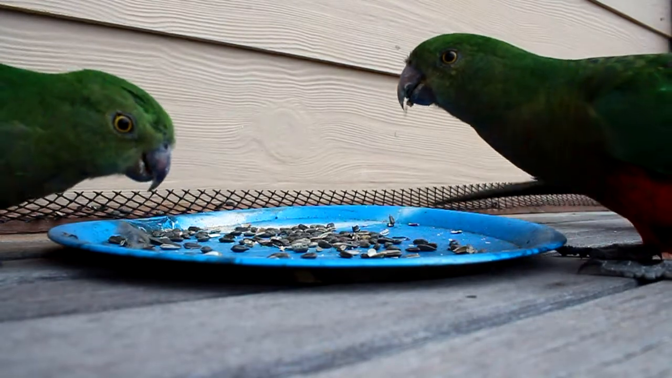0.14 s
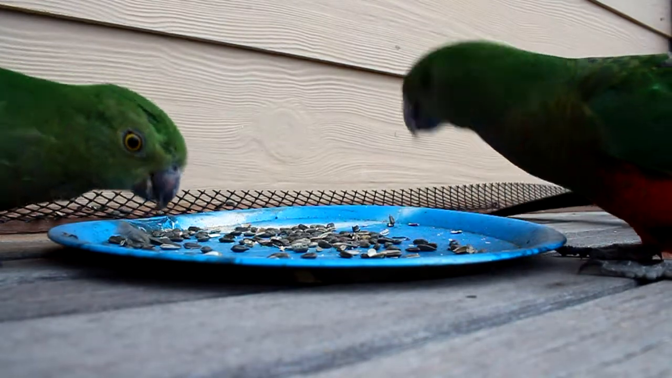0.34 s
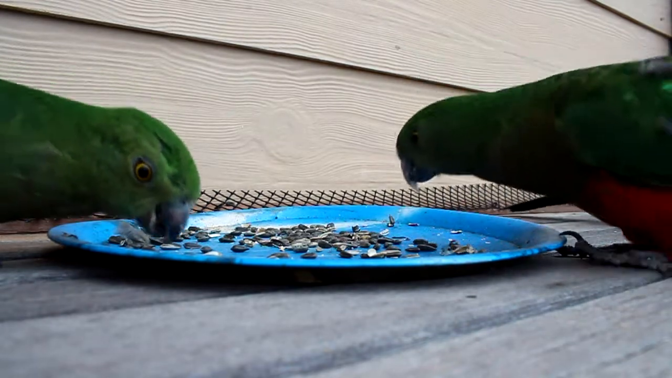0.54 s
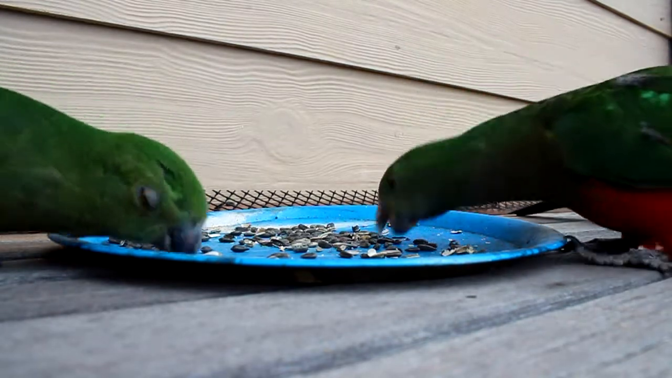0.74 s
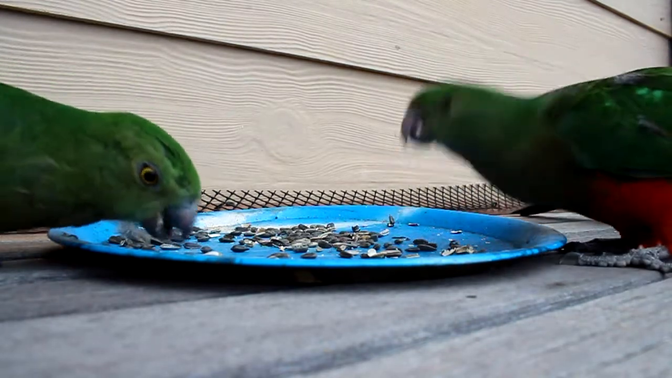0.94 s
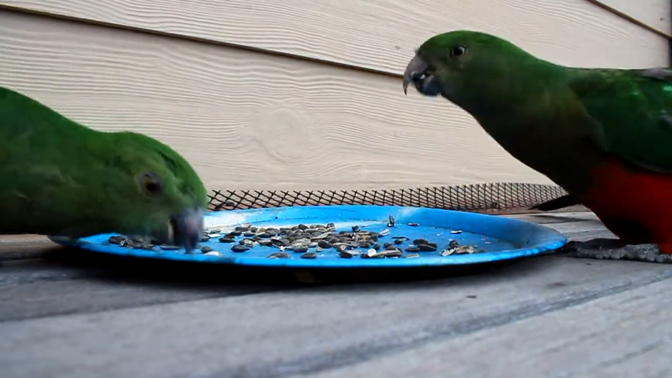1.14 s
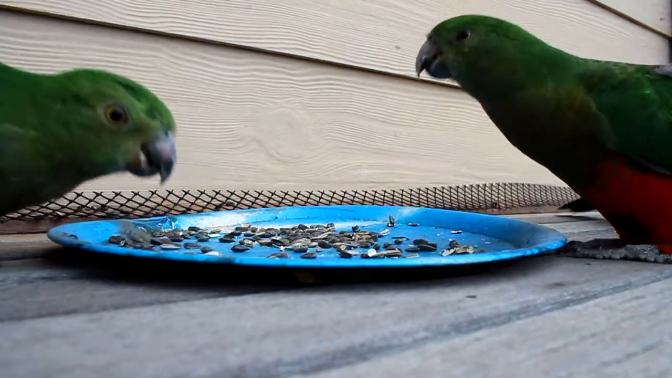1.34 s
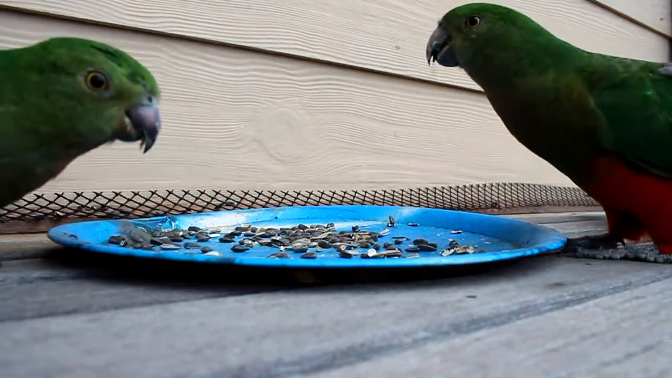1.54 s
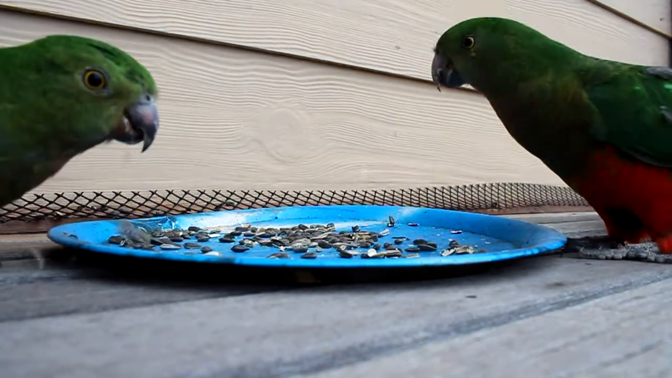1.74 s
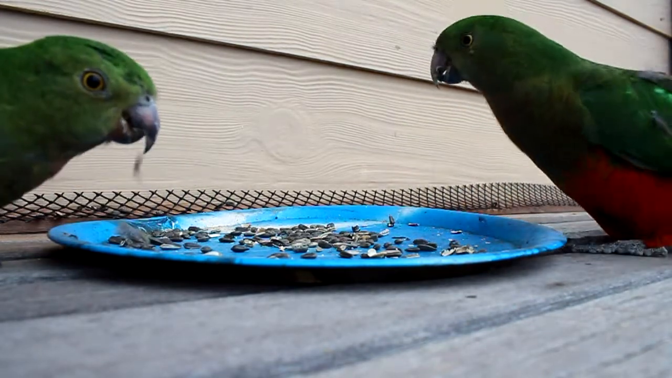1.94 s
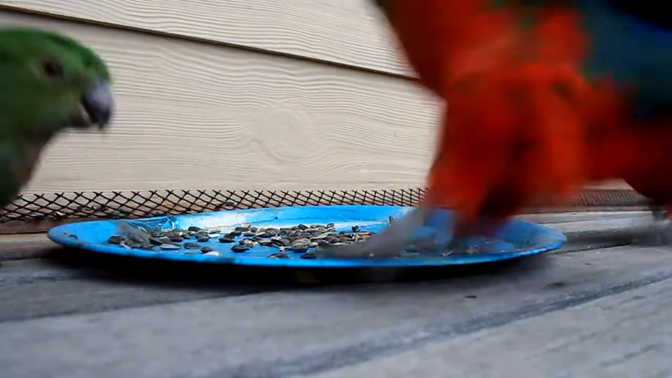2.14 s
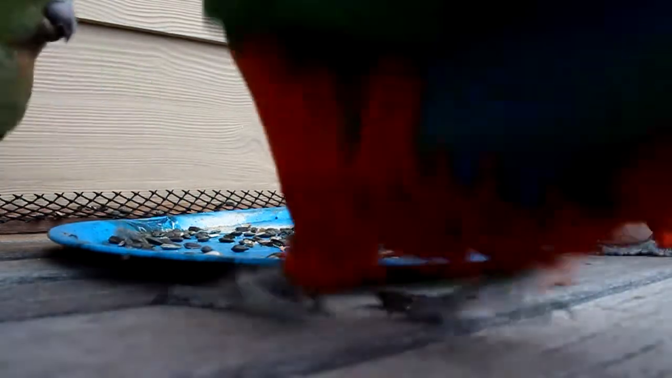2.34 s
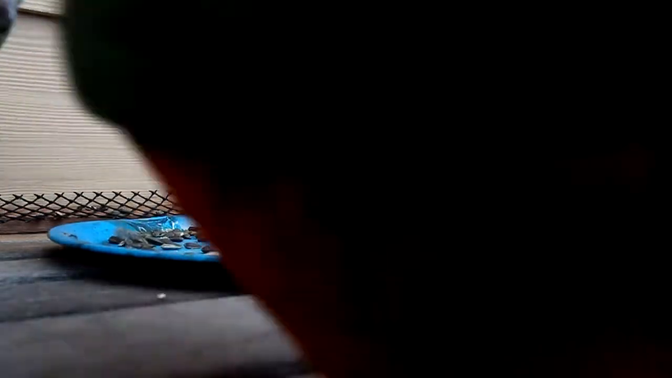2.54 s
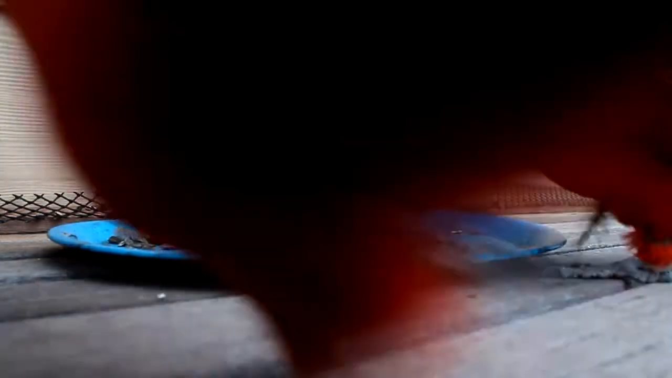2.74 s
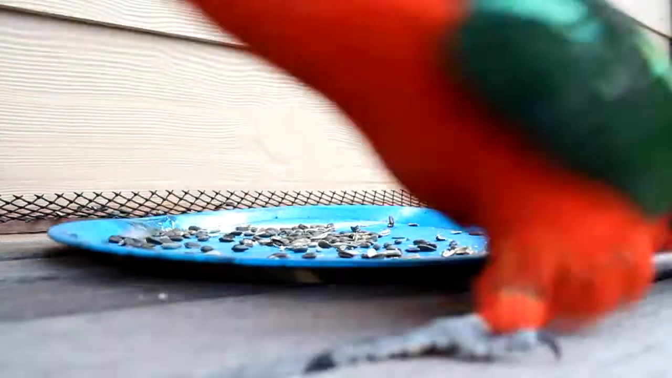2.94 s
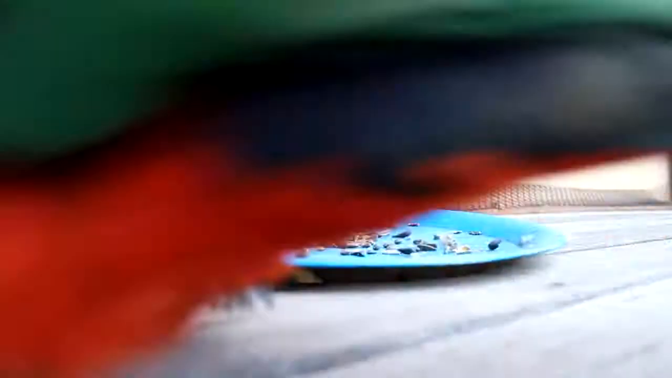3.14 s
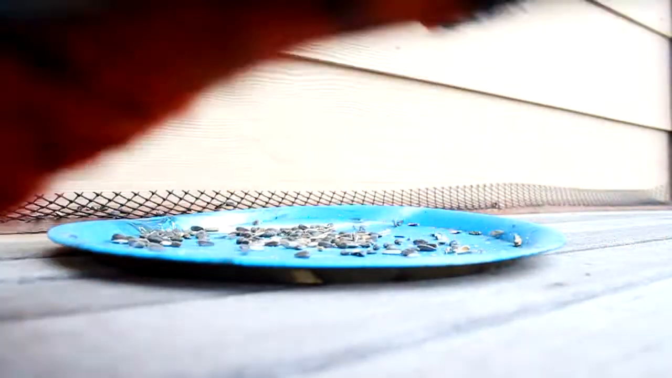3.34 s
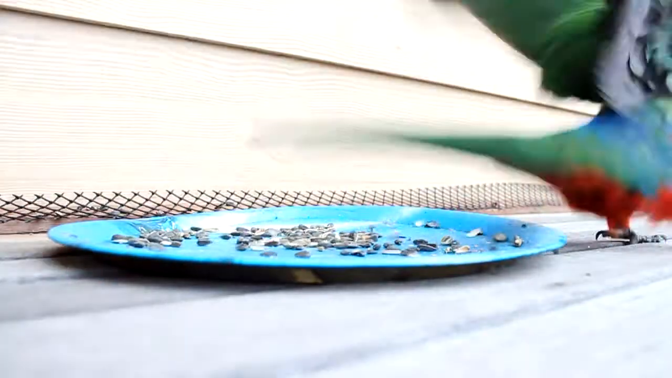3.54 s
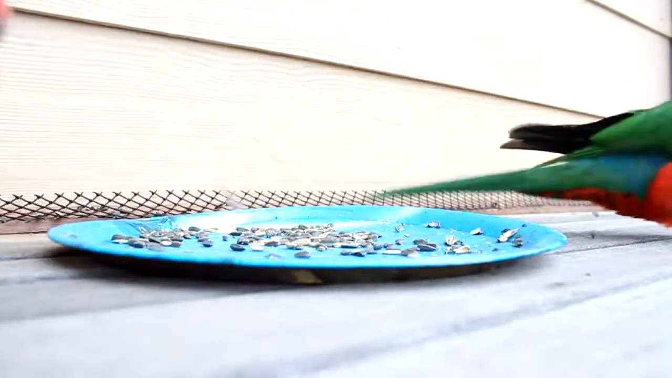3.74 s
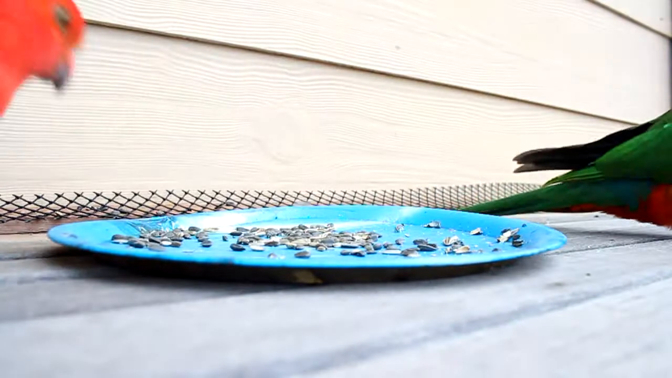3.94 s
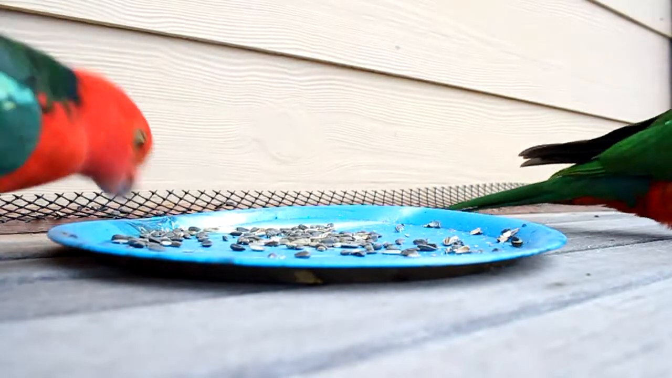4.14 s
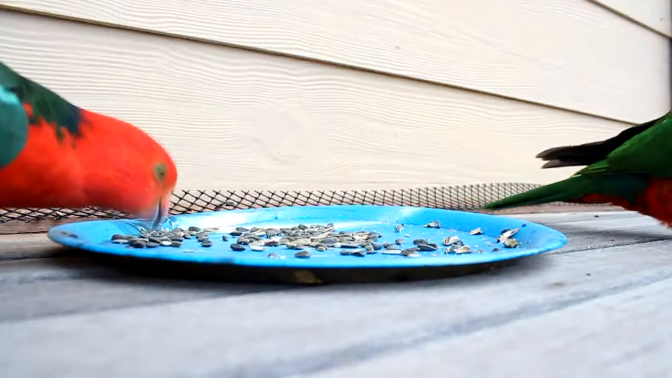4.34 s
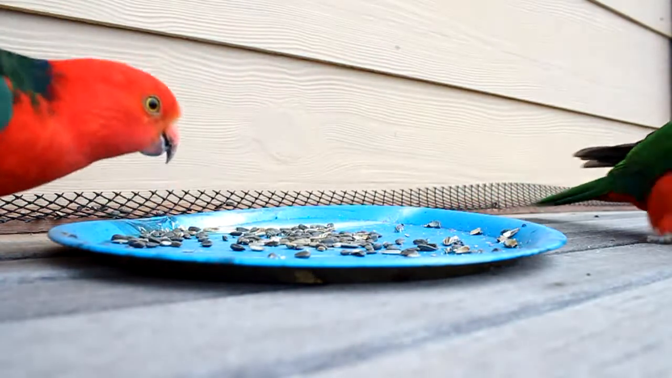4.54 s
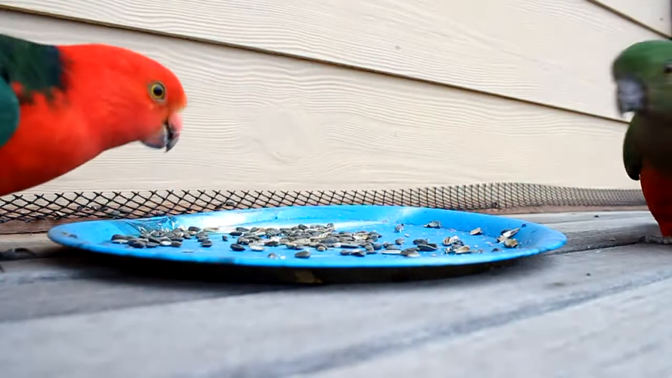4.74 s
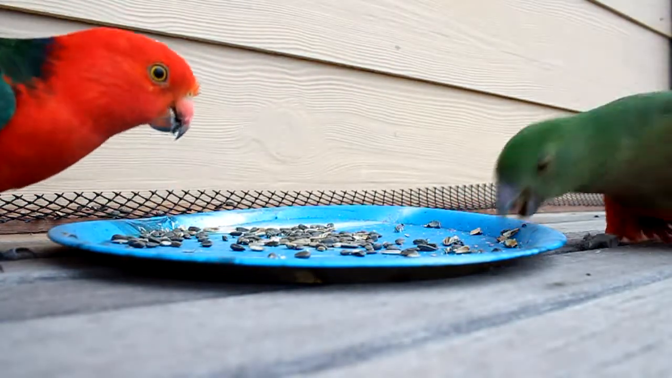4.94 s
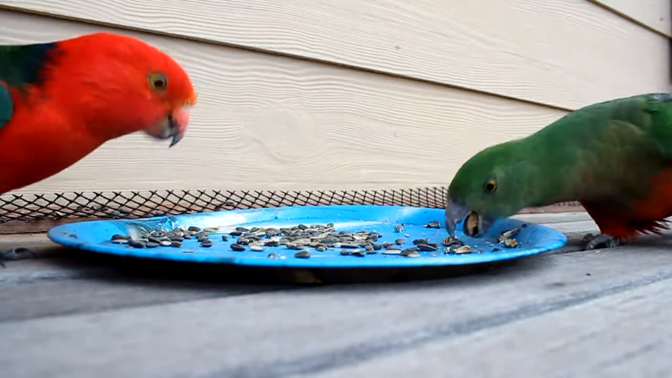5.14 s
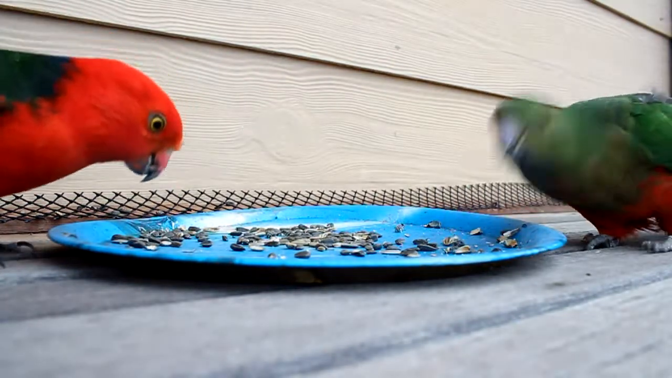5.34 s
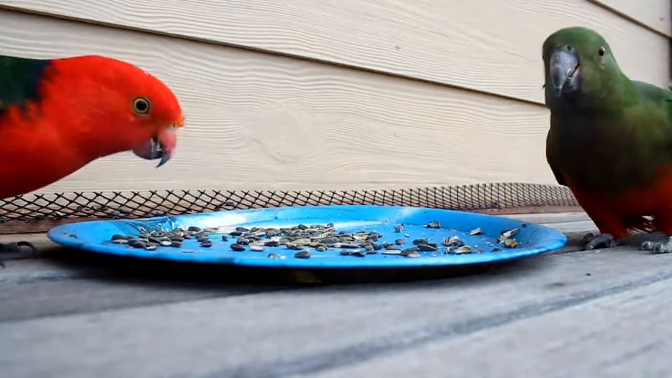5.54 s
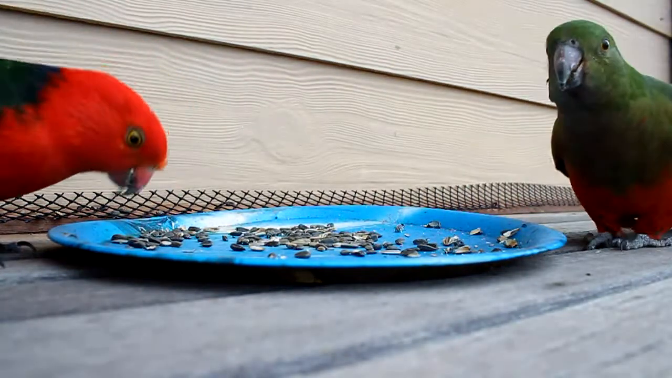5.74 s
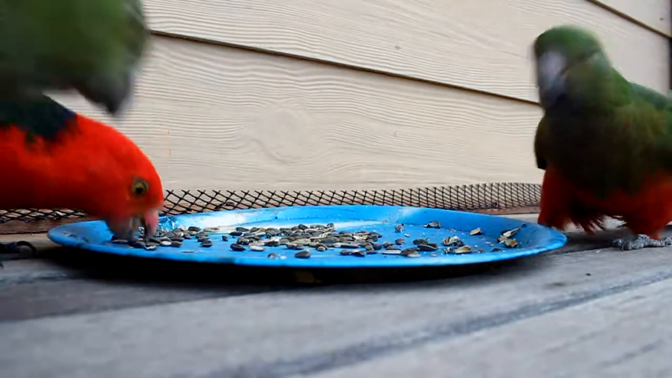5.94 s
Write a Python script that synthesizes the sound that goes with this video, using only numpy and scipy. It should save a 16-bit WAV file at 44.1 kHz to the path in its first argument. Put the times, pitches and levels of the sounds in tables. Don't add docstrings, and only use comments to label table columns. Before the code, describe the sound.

Close, dry seed cracking and beak pecks on a plate, interrupted midway by squawking and fluttering wings, then quieter feeding again.

```python
import sys
import numpy as np
from scipy import signal
from scipy.io import wavfile
from scipy.ndimage import uniform_filter1d

SR = 44100
rng = np.random.default_rng(int(sys.argv[2]) if len(sys.argv) > 2 else 0)


def invert_db(x):
    u = np.asarray(x, float) / 20
    return 10 ** u


def materialize(psi):
    bounded = np.clip(np.atleast_2d(psi).T, -1, 1)
    quanta = np.round(bounded * 32767).astype(np.int16)
    wavfile.write(sys.argv[1], SR, quanta)


N = 263277
HUSK_HZ = 7070


def rms_one(x):
    return x / np.sqrt(np.mean(x ** 2) + 1e-20)


def at_hz(points, hz):
    point_hz, point_db = np.transpose(points)
    return np.interp(np.log(hz), np.log(point_hz), point_db)


def drift(rate_hz, size):
    r = np.exp(-2 * np.pi * rate_hz / SR)
    return rms_one(signal.lfilter([1], [1, -2 * r, r * r], rng.standard_normal(size + 4000))[4000:])


def resonate(x, hz, width_hz):
    r = np.exp(-np.pi * width_hz / SR)
    zeros = np.array([1, 0, -1]) * (1 - r * r) / 2
    return signal.lfilter(zeros, [1, -2 * r * np.cos(2 * np.pi * hz / SR), r * r], x)


def swell(s, db, half_s):
    return invert_db(db - 16.5 * np.abs(np.arange(N) / SR - s) / half_s)


def add(out, s, piece, peak_db):
    i = round(s * SR)
    piece = piece[:N - i]
    out[i:i + len(piece)] += invert_db(peak_db) * piece / np.max(np.abs(piece))


def grains(per_s, spread_db):
    sizes = invert_db(spread_db * np.minimum(rng.exponential(1, (2, N)), 4))
    hits = rng.random((2, N)) < per_s / SR
    return rng.standard_normal((2, N)) * (0.15 + sizes * hits)


def banded(source, spectrum, patchy_db):
    out, edges = 0, 24 * 2 ** np.arange(0, 10, .5)
    for k, (low, high) in enumerate(zip(edges, edges[1:])):
        bandpass = signal.butter(2, [low, high], "band", fs=SR, output="sos")
        band = signal.sosfilt(bandpass, source[k % 2])
        flicker_db = patchy_db * np.minimum(drift(29.0, N), 1.4)
        out = out + invert_db(at_hz(spectrum, np.sqrt(low * high)) + flicker_db) * band
    return rms_one(out)


def contacts(table, sharpness, broad_db, low_hz, ring_db):
    out, t = np.zeros(N), np.arange(6000) / SR
    highpass = signal.butter(2, low_hz, "high", fs=SR, output="sos")
    for (s, peak_db, hz, t60), noise in zip(table, rng.standard_normal((len(table), 2, len(t)))):
        dying = invert_db(-60 * t / np.clip(t60, .004, .4))
        burst = noise[0] * invert_db(18 * uniform_filter1d(noise[1], size=40)) * dying
        note_gain = invert_db(ring_db) * np.clip(.15 / t60, .5, 3) * (hz < 1100)
        note = note_gain * np.sin(2 * np.pi * hz * t) * (1 - np.exp(-t / .004)) * dying
        coloured = resonate(burst, hz, hz / sharpness)
        broad = invert_db(broad_db) * signal.sosfilt(highpass, burst)
        add(out, s, coloured + broad + note, peak_db)
    return out


def knocks_of_beaks_and_claws():
    # (time [s], peak [dB], pitch [Hz])
    claws = [(0, -27.5, 1260), (0.104, -27.5, 1440), (.237, -31.5, 1950), (.297, -37, 1570),
             (0.456, -33, 1750), (.6, -31, 1640), (0.721, -22, 1650), (1.427, -28, 1190),
             (1.812, -35, 1900), (2.111, -41, 1290), (2.5, -24, 1260), (3.684, -30, 1420),
             (3.86, -29, 1420), (4.117, -29, 1450), (4.399, -31, 1120), (4.524, -31, 1120),
             (4.589, -30.5, 1420), (5.937, -40.5, 1530)]
    # (time [s], peak [dB], pitch [Hz], t60 [s])
    pecks = [(.055, -36, 860, 0.061), (.108, -48.5, 500, 0.14), (.165, -49, 507, 0.25),
             (.36, -43, 265, 0.53), (.553, -37, 812, 0.26), (.703, -38.5, 810, 0.024),
             (.824, -28.5, 789, 0.23), (.902, -38, 800, 0.23), (1.095, -27.5, 813.5, 0.19),
             (1.17, -38.5, 918, 0.16), (1.94, -37, 905, 0.16), (2.212, -24, 866, 0.31),
             (2.391, -22.5, 842, 0.27), (2.404, -19, 1170, 0.12), (2.418, -27, 845, 0.32),
             (2.559, -31.5, 910, 0.22), (2.645, -19, 905, 0.033), (2.66, -32.5, 917, 0.21),
             (3.722, -33, 853, 0.056), (3.634, -39, 799, 0.52), (3.896, -33, 980, 0.096),
             (4.013, -43, 1060, 0.084), (4.159, -35, 943, 0.19), (4.326, -32, 715.5, 0.19),
             (4.36, -25, 1060, 0.097), (4.708, -30, 822, 0.073), (4.822, -36, 894, 0.023),
             (5.282, -33.5, 820, 0.007), (5.389, -29, 825, 0.094), (5.584, -38, 860, 0.042),
             (5.704, -36, 886, 0.17), (5.819, -32, 852, 0.053)]
    claw_t60_s = 0.084
    blows = pecks + [(*row, claw_t60_s) for row in claws]
    return contacts(blows, sharpness=3.2, broad_db=-51.5, low_hz=500, ring_db=-15.5)


def plate(blows):
    # (pitch [Hz], level [dB], t60 [s])
    modes = [
        (512.6, 3.5, 0.074),
        (800, 0.5, 0.24),
        (873, -1, 0.41),
        (1060, -41, 0.53),
        (1420, -5.5, 0.033),
        (1970, -5.5, 0.0074),
    ]
    return sum(invert_db(db) * resonate(blows, hz, np.log(1000) / np.pi / t60) for hz, db, t60 in modes)


def stirring():
    # (time [s], level [dB])
    stir = [(0, -51.5), (.65, -56), (.9, -66), (1.3, -52), (1.852, -61.5), (2.08, -49.5), (2.18, -52.5),
            (2.4, -44.5), (2.621, -61.5), (2.93, -31.5), (3.03, -80), (3.5, -57), (4.27, -56.5), (4.8, -60),
            (4.928, -45.5), (5.05, -59), (5.47, -52), (5.7, -56.5)]
    stir_db = np.interp(np.arange(N) / SR, *np.transpose(stir))
    return stir_db, invert_db(2.0 * drift(18, N))


def feather_rustle(stir_db, jerks):
    # (frequency [Hz], density [dB per Hz])
    rustle_spectrum = [(1180, -70), (2000, 8), (3250, -4.5), (3510, -1.5), (13600, -9), (15800, -2)]
    # (time [s], level [dB], half length [s])
    flurries = [
        (2.69, -40.5, 0.072),
        (2.95, -31, 0.071),
        (2.85, -43.5, 0.069),
        (2.975, -34, .03),
        (3.52, -50.5, 0.64),
    ]
    level = invert_db(-58.5 + .65 * (stir_db + 52.5)) + sum(swell(*row) for row in flurries)
    return level * jerks * banded(grains(900, spread_db=1.2), rustle_spectrum, patchy_db=3.0)


def body_shuffle(stir_db, jerks):
    # (frequency [Hz], density [dB per Hz])
    shuffle_spectrum = [(120, -26), (200, -14.5), (736, -15), (804, 10), (983, -19.5), (1250, -12),
                        (4000, -27), (5200, -24), (8800, -120)]
    return invert_db(stir_db - 2) * jerks * banded(grains(600, spread_db=3.0), shuffle_spectrum, patchy_db=1.5)


def background_hiss():
    # (frequency [Hz], density [dB per Hz])
    hiss_spectrum = [(15, -36), (25, 17), (59, -17), (513, 17.5), (587, 8.5), (881, 11), (4450, -3.5),
                     (7420, 3.5), (15800, -39)]
    return invert_db(-60 - 4) * banded(rng.standard_normal((2, N)), hiss_spectrum, patchy_db=1.5)


def stirred_air():
    # (time [s], level [dB], half length [s], middle of the rumble [Hz])
    wafts = [(0.454, -47.5, 0.11, 252), (.48, -52, 0.065, 60.6), (0.88, -48.5, 0.23, 288),
             (0.954, -54.5, 0.054, 70.6), (1.974, -56, 0.029, 252), (2.364, -50.5, 0.19, 230),
             (2.666, -49.5, 0.31, 254), (2.872, -48, 0.066, 37.4), (4.936, -50.5, 0.13, 40.3),
             (3.026, -23, 0.043, 220), (3.072, -32, 0.053, 245), (3.185, -28, 0.039, 237),
             (3.15, -44, 0.16, 30), (3.614, -46, 0.15, 29.6), (3.536, -43.5, 0.17, 171.5),
             (3.651, -32.5, 0.011, 155), (3.775, -33.5, 0.061, 139), (4.106, -57.5, 0.088, 79.4),
             (4.403, -55, 0.34, 320), (4.955, -47, 0.14, 204), (5.466, -50, 0.13, 215)]
    still_air = (0, -70.5, 1e3, 117)
    out = np.zeros(N)
    air = rng.standard_normal(N) * invert_db(3.0 * drift(40, N))
    for s, db, half_s, hz in wafts + [still_air]:
        bandpass = signal.butter(2, [hz / 1.96, hz * 2.45], "band", fs=SR, output="sos")
        out += swell(s, db, half_s) * rms_one(signal.sosfilt(bandpass, air))
    return out


def all_cracks():
    # (time [s], peak [dB])
    husks = [(.0421, -8), (.058, -23), (.1536, -25), (.1978, -20), (.2144, -8.5), (1.2773, -33),
             (1.467, -19.5), (1.5827, -18), (1.6413, -28), (1.6562, -17.5), (1.8101, -8), (1.8283, -19.5),
             (1.8844, -23.5), (2.0582, -27), (3.6349, -30), (3.799, -23), (3.8954, -24), (4.3986, -30.5),
             (4.6534, -21), (4.689, -19), (4.7053, -24), (5.0118, -22), (5.3287, -29), (5.475, -25.5),
             (5.5375, -10), (5.568, -18), (5.6779, -27.5), (5.7645, -23.5), (5.789, -21)]
    # (time [s], peak [dB])
    shells = [(.0283, -20), (.344, -33), (.4559, -29), (.9763, -30.5), (1.0057, -40), (1.0465, -32),
              (1.4142, -4), (1.4244, -8), (1.6357, -31), (1.6434, -18), (1.6839, -21), (2.1163, -1.5),
              (2.2024, -26), (2.512, -24), (2.9983, 3), (3.482, -17), (5.0554, -16.5), (5.5738, -18.5)]
    # (time [s], peak [dB])
    splinters = [(.1406, -23), (.2303, -29), (1.4118, -0.5), (1.5384, -18.5), (1.5548, -8), (1.752, -25.5),
                 (1.7858, -8.5), (2.0184, -19), (2.0256, -14), (2.0286, -32), (3.6536, -19.5),
                 (4.2857, -27), (4.8057, -54), (4.8154, -21), (4.824, -21), (4.9632, -5.5), (4.9705, -23),
                 (4.9767, -16), (5.605, -14)]
    # (time [s],
    # peak [dB], pitch [Hz])
    pitched_snaps = [(0.218, -16, 5830), (0.578, -20.5, 4000), (.602, -21, 5070), (0.7213, -14, 4400),
                     (1.1722, -20.5, 2960), (1.4301, -10.5, 2700), (2.5, -23.5, 2770), (2.647, -20, 6100),
                     (2.654, -32, 2530), (2.9938, 4, 3000), (3.0044, -19, 3400), (3.7086, -25, 3030),
                     (4.365, -20, 2700), (4.484, -32.5, 3200), (4.9144, -23.5, 5600), (5.3897, -23.5, 5200),
                     (5.7049, -21, 2850), (5.9366, -18, 5300), (4.6898, -14.5, 2320), (5.0572, -19, 1600),
                     (2.3915, -16, 2420), (2.408, -16, 2000), (2.413, -20, 1510), (3.482, -21, 2600),
                     (4.0143, -25, 2970), (3.038, -38, 2600)]
    # (time [s], peak [dB])
    crumbs = [(0.868, -23.5), (0.939, -35), (1.3299, -28.5), (4.6495, -34), (1.444, -20), (1.4514, -22),
              (1.4574, -22), (1.5184, -40), (1.568, -32), (1.6076, -36), (1.677, -31), (1.7644, -44),
              (1.796, -15.5), (4.671, -39), (4.7945, -44), (4.8186, -31), (4.9327, -41), (4.9441, -50),
              (5.022, -35), (5.552, -29), (5.5982, -33), (5.618, -49), (2.3133, -26), (2.429, -25),
              (2.445, -35), (2.5427, -29.5), (2.765, -29), (2.9691, -34), (3.941, -35), (3.969, -38),
              (4.065, -30), (4.274, -42)]
    kinds = ((husks, HUSK_HZ), (shells, 9800), (splinters, 17700))
    snaps = [(*row, hz) for rows, hz in kinds for row in rows]
    return snaps + pitched_snaps + [(*row, 10500) for row in crumbs]


def cracks():
    out, t = np.zeros(N), np.arange(2000) / SR
    highpass = signal.butter(2, 900, "high", fs=SR, output="sos")
    snaps = all_cracks()
    for (s, peak_db, hz), noise in zip(snaps, rng.standard_normal((len(snaps), len(t)))):
        click = np.sign(noise[0]) * (t == 0)
        lumps_db = 30 * uniform_filter1d(noise[::-1], size=30)
        crumbling = invert_db(-28 + 4 * noise[1] - 60 * t / .022 + lumps_db)
        burst = click + noise * (.35 * np.exp(-t / .0002) + crumbling)
        hz = min(hz * np.exp(.07 * noise[2]), .42 * SR)
        grinding = noise[::-1] * invert_db(-19 - 60 * t / 0.074 + 40 * uniform_filter1d(noise, size=60))
        grind = min(hz / HUSK_HZ, 1) ** 2 * resonate(grinding, HUSK_HZ, 1600)
        hollow = 4.1 * resonate(burst, hz, hz / 3.8)
        broad = invert_db(-4.5 - 0.28 * np.log2(hz / 7000)) * signal.sosfilt(highpass, burst)
        sparkle = 1.56 * resonate(burst, 14600, 2900)
        thud = invert_db(6.5 - 1.5 * np.log2(hz / 5000)) * resonate(burst, 1690, 1320)
        add(out, s, grind + hollow + broad + sparkle + thud, peak_db)
    return out + invert_db(-2.0) * resonate(out, 7200, 760)


def near_echoes(snaps):
    # (delay [s], level [dB])
    reflections = [
        (.0017, -17),
        (.0046, -17.5),
    ]
    return sum(invert_db(db) * np.pad(snaps, (round(late * SR), 0))[:N] for late, db in reflections)


def seed_rattles():
    # (time [s], peak [dB], brightest [Hz], t60 [s])
    scatters = [(0.0403, -11, 8800, 0.077), (0.1493, -24, 7260, 0.074), (0.2115, -20.5, 6140, 0.057),
                (0.3423, -19.5, 6300, 0.038), (0.4558, -39, 4130, 0.23), (0.5784, -19, 10500, 0.084),
                (0.7208, -13.5, 4000, 0.13), (0.8295, -22, 3670, 0.31), (1.0972, -27.5, 2840, 0.11),
                (1.928, -26, 8800, 0.12), (2.0572, -29, 6070, 0.46), (2.1161, 5, 10500, 0.08),
                (2.2036, -10, 9800, 0.15), (2.3495, -18, 3700, 0.47), (2.4982, -43, 3020, 0.06),
                (2.646, -15, 5000, 0.024), (2.997, 2, 4100, 0.052), (3.4819, -31.5, 7360, 0.46),
                (3.7978, -50, 7900, 0.091), (4.0146, -32, 3230, 0.44), (4.117, -26, 3440, 0.074),
                (5.9356, -14, 5900, 0.085)]
    # (pitch [Hz], level [dB])
    rim = [(1450, 14), (2240, 4), (3103, 4.5), (5500, 1.5), (6700, -15), (4000, -5), (6040, 4),
           (10500, -13), (11170, 4), (4400, -1.5)]
    rattles = contacts(scatters, sharpness=1.3, broad_db=-13, low_hz=1300, ring_db=-60)
    return rattles + sum(invert_db(db + 3.5) * resonate(rattles, hz, 25 + hz / 200) for hz, db in rim)


def scuffs_and_slaps():
    # (time [s], peak [dB], brightest [Hz], t60 [s])
    scuffs = [(.104, -55, 4000, 0.052), (.23, -27, 5500, 0.045), (.297, -59, 3500, 0.082),
              (.355, -32.5, 4150, 0.033), (.3974, -51, 2300, .03), (.4134, -42, 2500, .05),
              (.468, -40, 4200, 0.13), (.555, -34.5, 3000, 0.034), (.669, -42, 4400, .06),
              (.698, -38.5, 2480, 0.048), (.781, -42, 7000, 0.023), (.79, -44, 3000, 0.044),
              (.824, -36, 4500, .2), (.965, -39.5, 1680, 0.049), (1.0325, -40, 6000, 0.02),
              (1.13, -38, 1500, .04), (1.155, -55, 7000, 0.018), (1.206, -38, 1650, 0.072),
              (1.251, -37.5, 2350, 0.037), (1.281, -39, 5430, .02), (1.296, -56, 2980, 0.045),
              (1.344, -41, 8000, .03), (1.365, -34, 2430, 0.023), (2.237, -19.5, 4950, 0.066),
              (2.268, -27.5, 4000, 0.056), (2.289, -43, 9550, 0.016), (2.364, -44, 3200, 0.031),
              (2.391, -44, 5000, 0.14), (2.405, -28, 3180, 0.12), (2.436, -33, 1990, .06),
              (2.5625, -32, 4319, 0.088), (2.679, -29, 8000, .1), (2.729, -47, 6950, 0.024),
              (2.876, -24, 4550, 0.065), (2.94, -19, 5000, 0.05),
              (3.941, -51, 1600, 0.057), (4.107, -34, 2980, 0.12), (4.184, -38, 1690, 0.085),
                   (4.223, -40.5, 1900, 0.042), (4.331, -32.5, 1720, 0.096), (4.45, -61, 1700, 0.031),
                   (4.473, -59, 1700, .03), (4.5032, -36, 3670, 0.11), (4.781, -40, 1710, 0.079),
                   (4.868, -69, 1950, .05), (5.171, -37.5, 2470, 0.052), (5.254, -42, 2700, 0.03),
                   (5.505, -36, 2600, 0.036), (5.819, -38, 1900, 0.067), (5.915, -38.5, 6800, 0.086),
                   (4.805, -40, 13000, 0.061), (4.964, -30, 13400, 0.046), (4.655, -49, 13000, 0.087),
                   (5.538, -28, 12000, 0.082), (5.94, -24.5, 12000, 0.061)]
    # (time [s], peak [dB], brightest [Hz], t60 [s])
    slaps = [(2.992, -10, 563, 0.043), (3.002, -1.5, 567, 0.021), (3.051, -34, 597, 0.031),
             (3.166, -45, 600, 0.094), (3.179, -34.5, 660, 0.043), (3.195, -26, 800, 0.05),
             (3.24, -31, 600, 0.093), (3.533, -31, 800, 0.037), (3.777, -57, 750, 0.043),
             (3.689, -42, 850, 0.16)]
    blows = scuffs + slaps
    return contacts(blows, sharpness=1.27, broad_db=-25.5, low_hz=1200, ring_db=-60)


def squeak_shape(start, length, hz, whistle_db, croak_db, over_db, sag_per_s, rough):
    break_s, croak_s, release_s = .006, .01103, .009
    croak_hz, croak_end_hz, croak_noise = 803, 479, .32
    s = start + np.cumsum([0, length / 2, length / 2, break_s / 2, break_s / 2, croak_s, release_s])
    sag = sag_per_s * length
    strain = .7 * (croak_db > -55)
    hoarse_db = 6.5 + 40 * (.2 - abs(start - 3.15))
    pitch_hz = [hz * (1 + sag), hz, hz * (1 - sag), np.sqrt(hz * croak_hz), croak_hz,
                (croak_hz + croak_end_hz) / 2, croak_end_hz]
    level_db = [whistle_db - 5.5, whistle_db, whistle_db - 3.0 + 7.9 * strain, croak_db - 7,
                croak_db - 2.0, croak_db, croak_db - 22.5]
    strained_db = over_db + strain * (hoarse_db - over_db)
    overtones_db = [over_db, over_db, strained_db, hoarse_db - 3, hoarse_db, hoarse_db, hoarse_db]
    return s, pitch_hz, level_db, overtones_db, [rough] * 3 + [croak_noise] * 4


def squeaks():
    # (time [s], whistle length [s], pitch [Hz], whistle level [dB], croak level [dB])
    breaking = [
        (2.57, 0.0089, 2590, -44, -68),
        (2.582, 0.0068, 2476, -40, -35.5),
        (2.65, 0.011, 2605, -29, -56),
        (2.685, 0.0078, 2485, -43, -33.5),
        (2.79, 0.0093, 2550, -38, -24.5),
        (2.879, 0.025, 2450, -23, -11),
        (2.997, 0.0026, 2376, -24, -19),
        (3.091, 0.009, 2350, -25.5, -20.5),
        (3.274, 0.0079, 2324, -40, -29),
    ]
    doubled = [
        (2.961, 0.03, 1200, -31, -70),
        (3.059, 0.045, 1163, -35.5, -68),
        (3.151, 0.0406, 1207, -42, -64),
        (3.244, 0.03, 1117, -39.5, -68),
    ]
    retreat = [
        (3.333, 0.044, 689, -41.5, -32),
        (3.426, 0.016, 708, -34.5, -35.5),
    ]
    parting = [
        (3.491, 0.0061, 1500, -35, -54),
        (3.572, 0.007, 1097, -44, -36),
    ]
    leads = [
        (2.761, 0.029, 2416, -28, -70),
        (2.861, 0.015, 2720, -28, -58),
    ]
    # (overtones [dB], pitch sag [share per s], roughness [0-1])
    manners = [
        (-11.5, 4.5, 0.01),
        (15, -0.7, 0.23),
        (34, -1.5, .2),
        (-15, 3.5, 0.23),
        (-28, 0.5, 0.12),
    ]
    # (frequency [Hz], width [Hz], level [dB])
    throat = [(930, 304, 7.5), (2700, 1700, 0), (4400, 1080, 7), (6800, 2700, 0.5)]
    out = np.zeros(N)
    kinds = zip((breaking, doubled, retreat, parting, leads), manners)
    for call in [(*row, *manner) for rows, manner in kinds for row in rows]:
        s, *columns = squeak_shape(*call)
        i = round(s[0] * SR)
        t = np.arange(i, round(s[-1] * SR) + 200) / SR
        hz, level_db, over_db, rough = [np.interp(t, s, c) for c in columns]
        rough = np.clip(rough, 0, 1)
        shake = (0.018 + 0.142 * rough) * drift(319, size=6000)[:len(t)]
        phase = 2 * np.pi * np.cumsum(hz * (1 + shake)) / SR
        tone = 0
        for k in range(1, 13):
            tone = tone + invert_db(over_db * (k > 1) - 2.3 * k) * np.cos(k * phase) * (k * hz < 12000)
        gate = (1 + np.cos(phase)) ** 2 / 2
        breath = 1.8 * invert_db(over_db) * rng.standard_normal(6000)[:len(t)] * gate
        source = tone + rough * breath
        voice = sum((-1) ** k * invert_db(db) * resonate(source, f, w) for k, (f, w, db) in enumerate(throat))
        voice /= np.sqrt(uniform_filter1d(voice ** 2, size=200) + 1e-6)
        edge = np.clip(np.minimum(t - s[0], t[-1] - t) / .003, 0, 1)
        flutter_db = 1.5 * drift(70, size=6000)[:len(t)]
        out[i:i + len(t)] += voice * invert_db(level_db + flutter_db) * edge
    return out


def swoops():
    # (time [s], length [s], from [Hz], to [Hz], peak [dB])
    slides = [(2.786, 0.0083, 2690, 2980, -31), (2.795, .013, 3020, 2260, -24),
              (3.098, 0.02, 2270, 452, -33), (3.28, 0.0201, 2224, 435, -34.5),
              (3.356, 0.013, 2400, 3180, -41), (3.34, 0.011, 2450, 2350, -43),
              (3.376, 0.02, 3090, 710, -39), (3.44, 0.0174, 1450, 712, -33.5),
              (3.5, 0.026, 1787, 480, -34.5), (3.569, 0.022, 1263, 487, -32.5),
              (3.584, 0.02, 1580, 800, -36)]
    out = np.zeros(N)
    for (s, length, hz, end_hz, db), noise in zip(slides, rng.standard_normal((len(slides), 2000))):
        along = np.linspace(0, 1, min(round(length * SR), 2000))
        wobble = 1 + .2 * uniform_filter1d(noise, size=60)[:len(along)]
        phase = 2 * np.pi * np.cumsum(hz * (end_hz / hz) ** along * wobble) / SR
        note = np.sin(phase) + invert_db(-17) * np.sin(2 * phase)
        add(out, s, note * np.sqrt(np.sin(np.pi * along) + 1e-9), db)
    return out


def wing_gusts():
    # (time [s], peak [dB], quickness [Hz])
    gusts = [(2.996, 0, 560), (3.004, 2, 430), (3.034, -28, 300), (3.054, -12.5, 430), (3.069, -28, 400),
             (3.085, -23, 280), (3.169, -24, 520), (3.177, -18, 400), (3.183, -18, 324), (3.195, -29, 450),
             (3.201, -22.5, 530), (3.212, -39, 303), (3.24, -30.5, 450), (3.247, -25.5, 420),
             (3.521, -28, 302), (3.534, -17.5, 367), (3.554, -27, 302), (3.589, -21, 350),
             (3.594, -22, 370), (3.607, -27, 332), (3.62, -33, 220), (3.649, -36, 330), (3.654, -26.5, 278),
             (3.674, -33, 248), (3.745, -28.5, 248), (3.758, -33, 229), (3.769, -27, 260),
             (3.778, -20, 427), (3.785, -24, 330), (3.797, -27, 383), (3.811, -42, 300), (3.837, -32, 223)]
    out, t = np.zeros(N), np.arange(-441, 800) / SR
    for s, peak_db, hz in gusts:
        cycles = t * hz
        lump = -np.sin(2 * np.pi * cycles - .8) * np.exp(-(cycles / 0.5) ** 2)
        dip = 0.49 * np.exp(-((cycles - .45) / 0.089) ** 2)
        add(out, s + t[0], lump - dip, peak_db)
    return out


def scene():
    knocks = knocks_of_beaks_and_claws()
    stir_db, jerks = stirring()
    shuffle = body_shuffle(stir_db, jerks)
    steady = knocks + invert_db(3.0) * plate(knocks + shuffle)
    steady = steady + shuffle + feather_rustle(stir_db, jerks) + background_hiss()
    steady = steady + invert_db(-8.0) * seed_rattles() + scuffs_and_slaps() + squeaks()
    steady = signal.sosfilt(signal.cheby2(18, 50, 16050, fs=SR, output="sos"), steady)
    snaps = cracks()
    air = stirred_air() + wing_gusts()
    return (steady + snaps + near_echoes(snaps) + air + swoops())[None]


def top_cut(x):
    return signal.sosfilt(signal.butter(12, 17060, fs=SR, output="sos"), x)


def record(dry):
    knee_db, recovery_db_per_s, gain_share = -17.5, 96, 0.46
    over_db = np.maximum(20 * np.log10(np.abs(dry[0]) + 1e-9) - knee_db, 0)
    ramp = recovery_db_per_s * np.arange(N) / SR
    held_db = np.maximum.accumulate(over_db + ramp) - ramp
    duck_db = signal.lfilter([.03], [1, -.97], held_db)
    limited = .45 * np.tanh(dry * invert_db(-gain_share * duck_db) / .45)
    cut = signal.sosfilt(signal.cheby2(10, 60, 17200, fs=SR, output="sos"), limited)
    return top_cut(cut)


dry = scene()
out = record(dry)
materialize(out)
```